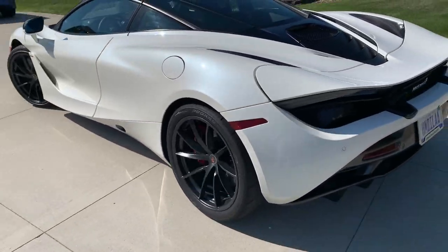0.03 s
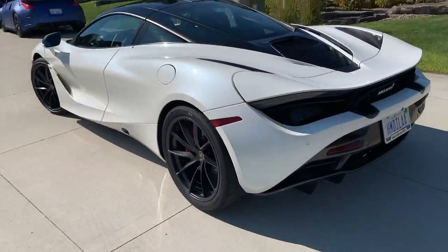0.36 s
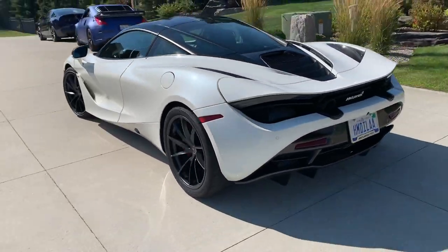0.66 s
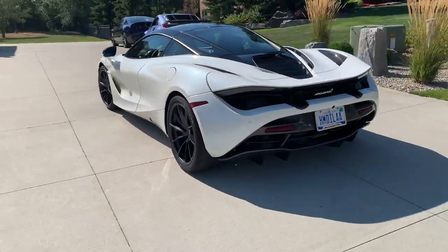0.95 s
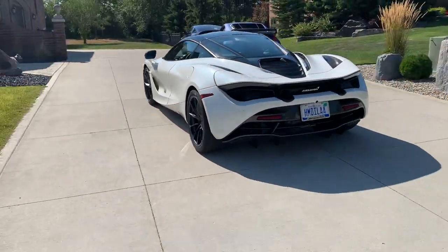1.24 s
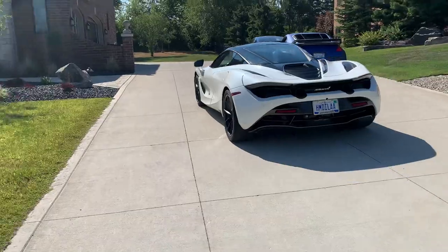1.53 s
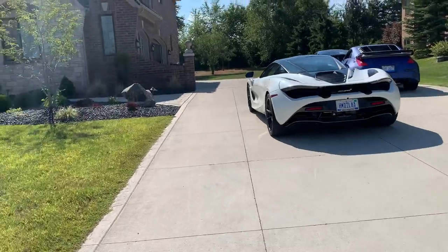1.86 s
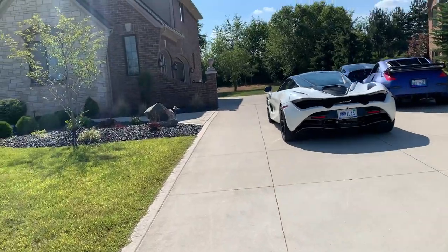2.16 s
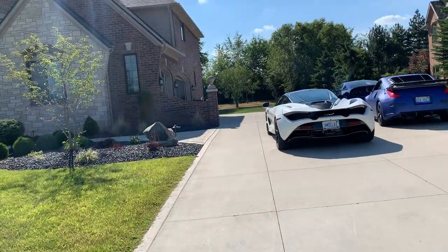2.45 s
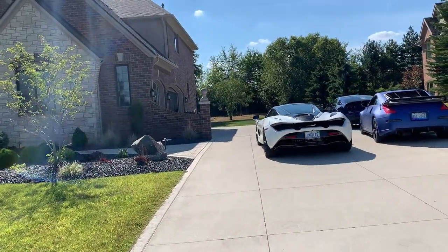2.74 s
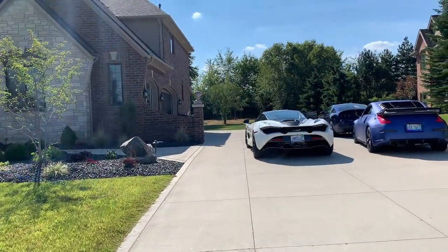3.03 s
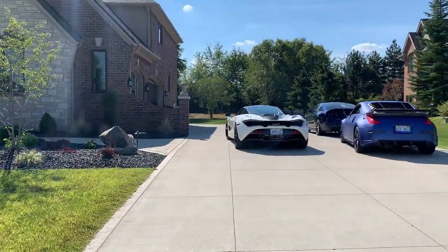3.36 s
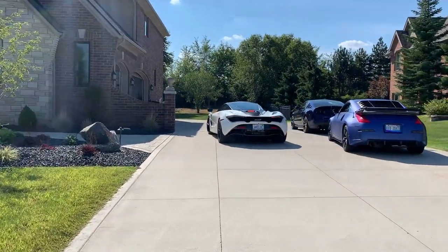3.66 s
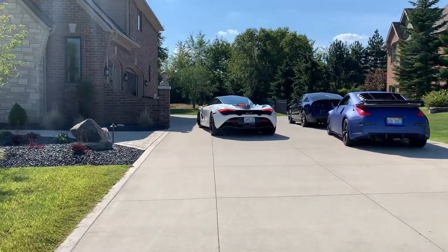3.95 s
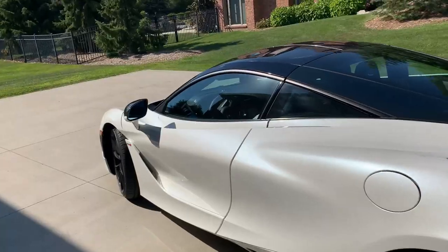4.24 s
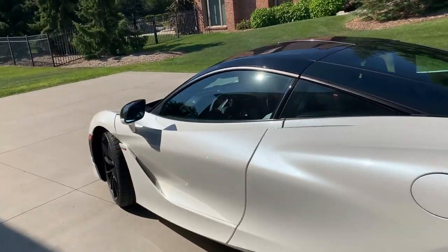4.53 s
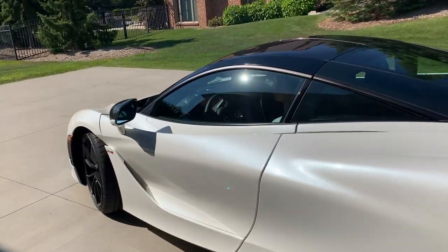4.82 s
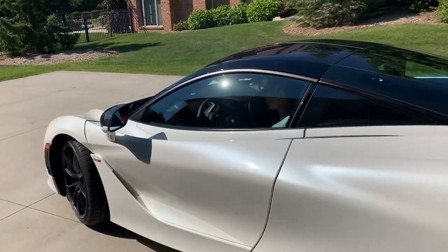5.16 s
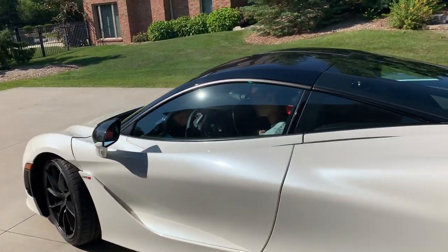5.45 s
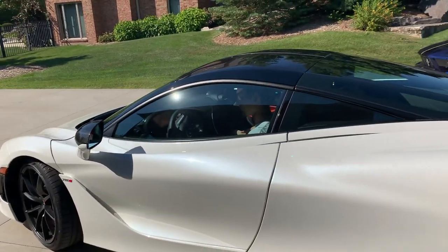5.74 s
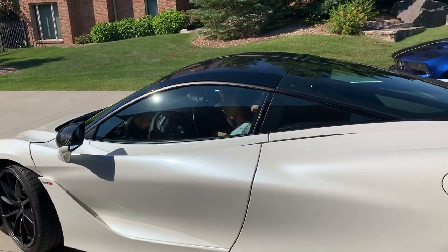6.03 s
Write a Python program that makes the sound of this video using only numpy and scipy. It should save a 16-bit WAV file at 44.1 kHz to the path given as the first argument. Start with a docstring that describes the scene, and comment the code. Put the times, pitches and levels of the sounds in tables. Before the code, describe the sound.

A sports car's engine booms deeply close to a hand-held phone on a concrete driveway, with small spits of exhaust and faint tyre hiss. From about 0.7 seconds it rises gently in pitch and swells into a raspy, barking growl, strongest around 1.5 seconds, as the car creeps away. At about 2 seconds the throttle closes. The engine falls in pitch and recedes in an uneven burble, with a few soft low pops, a faint gear whine and a short echo off a house. Light wind rumbles underneath. At 4.1 seconds the car's sound stops dead. A very quiet garden remains, with a low rumble and a thin, steady insect shrill. Small dry ticks sound close by between 4.3 and 5 seconds, soft rustles follow around 5.3, then a faint distant hum, and a few more ticks and rustles just after 6 seconds.

```python
"""A V8 sports car creeps away from a hand-held phone, up a concrete driveway, and rolls towards a halt.
Its periodic firings boom, excite the resonances of the tailpipes and expel turbulent puffs of gas;
off the throttle it burbles and a gear whines. The concrete and a house reflect the sound.
The engine sound stops dead, leaving a quiet garden: low rumble, insects, small ticks and rustles."""
import sys
import numpy as np
from scipy import signal
from scipy.fft import rfft, irfft, next_fast_len
from scipy.io import wavfile
from scipy.ndimage import uniform_filter1d

SR = 44100
rng = np.random.default_rng(int(sys.argv[2]) if len(sys.argv) > 2 else 0)


def store_wav(level_fs):
    """Save 16-bit WAV to argv[1]."""
    pcm = np.round(np.clip(np.atleast_2d(level_fs), -1, 1) * 32767)
    wavfile.write(sys.argv[1], SR, pcm.T.astype(np.int16))


N = 272978
T = np.arange(N) / SR
STOP_S = 4.108  # the car's sound ends

# firing rate of the engine: t/s, f/Hz
FIRING_RATE = [(0.0, 77.09), (0.35, 79.47), (0.7, 81.54), (0.9, 83.96), (1.12, 85.86), (1.44, 100.37),
               (1.6, 103.99), (1.89, 106.77), (2.1, 105.05), (2.33, 99.2), (2.49, 98.0), (2.66, 94.1),
               (3.43, 75.1), (3.66, 64.8), (3.8, 64.6), (4.1, 59.0)]
# path from the tailpipes to the phone: t/s, distance/m
DISTANCE = [(0, 2.2), (.7, 2.41), (1.2, 4.1), (2, 7.7), (3, 9.96), (4.1, 13.3)]
# spectrum of escaping gas: f/Hz, level/dB
HISS_SPECTRUM = [(2000, -23), (3400, 2.5), (4300, 3.5), (4800, -4.5), (5800, 0), (7500, 1.5), (8800, -1.5),
                 (10500, -6.5), (13000, -17.5), (15500, -16)]


def undb(db):
    """Amplitude ratio of a level in decibels."""
    return 10 ** (np.asarray(db) / 20)


def unit(x):
    """Normalisation to rms 1."""
    return x / np.sqrt(np.mean(x ** 2))


def curves(table):
    """Linear interpolation of each column over time."""
    s, *columns = np.transpose(table)
    return [np.interp(T, s, c) for c in columns]


def swell(s, half_s):
    """Gaussian envelope with peak 1."""
    return np.exp(-((T - s) / half_s) ** 2)


def noise():
    """White Gaussian noise."""
    return rng.standard_normal(N)


def drift(rate_hz):
    """Smooth random modulation; rms 1."""
    k = int(SR / rate_hz)
    steps = np.repeat(rng.standard_normal(N // k + 1), k)
    return unit(uniform_filter1d(steps, k)[:N])


def colour(x, spectrum):
    """Spectral shaping by points of f/Hz, level/dB; rms 1."""
    hz, db = np.transpose(spectrum)
    size = next_fast_len(N + SR // 4)
    f = np.maximum(np.fft.rfftfreq(size, 1 / SR), 1)
    gain = undb(np.interp(np.log(f), np.log(hz), db))
    return unit(irfft(rfft(x, size) * gain, size)[:N])


def band(x, hz, width):
    """Second-order resonator, gain 1 at its centre."""
    quality = hz / min(width, SR / 4)
    return signal.lfilter(*signal.iirpeak(min(hz, SR * .45), quality, fs=SR), x)


def ring(x, modes):
    """Superposition of steep-sided modes (f/Hz, nominal width/Hz, level/dB); rms 1."""
    return unit(sum(undb(db) * band(band(x, hz, 1.2 * width), hz, 1.2 * width)
                    for hz, width, db in modes))


def pulses(positions, sizes):
    """Impulse train at fractional sample positions; rms 1."""
    whole, part = positions.astype(int), positions % 1
    train = np.bincount(whole, sizes * (1 - part), N + 1) + np.bincount(whole + 1, sizes * part, N + 1)
    return unit(train[:N])


def throttle():
    """Engine load: the opening of the throttle, 0-1."""
    # one push of the pedal: t/s, opening/1
    pedal = [(0, 0.14), (.7, 0.62), (1.2, 0.84), (1.45, 0.89), (1.65, 0.73), (1.8, 0.48), (2.05, 0)]
    return np.clip(curves(pedal)[0], 0, 1)


def coasting(start_s=1.9, rise_s=.32):
    """Irregularity of combustion as the throttle shuts, 0-1."""
    return np.clip((T - start_s) / rise_s, 0, 1)


def settling(start_s=3.95, fall_db=-4):
    """Attenuation of the exhaust as the car comes to rest."""
    return undb(fall_db * np.clip((T - start_s) / (STOP_S - start_s), 0, 1))


def level(db, away_db=0, throttle_db=0, revs_db=0, aim_db=0, coast_db=0, idle_hz=80):
    """Gain from additive levels; away_db is per doubling of distance, revs_db per octave above idle."""
    metres, hz = curves(DISTANCE)[0], curves(FIRING_RATE)[0]
    on_axis = swell(1.21, .38)  # the pipes point at the phone for a moment
    return undb(db + away_db * np.log2(metres / metres[0]) + throttle_db * throttle()
                + coast_db * coasting() + revs_db * np.log2(hz / idle_hz) + aim_db * on_axis)


def silencer(hz):
    """Acoustic filter: the silencer lifts or absorbs a tone passing through one of its resonances."""
    # resonances: f/Hz, half width/Hz, gain/dB, extra gain at full throttle/dB
    resonances = [(142.3, 10, -12, 9.5), (182.9, 14, 3, 2), (243.7, 13, 0, -21), (318.7, 23, 0, 13),
                  (426, 28, 10.5, -4.5)]
    return undb(sum((db + extra_db * throttle()) * np.exp(-((hz - centre) / half) ** 2)
                    for centre, half, db, extra_db in resonances))


def boom(cycles, hz, flutter_db=1.15, overtone_flutter_db=2):
    """Harmonic series of the firing rate, with half orders from the unequal cylinder banks."""
    # fundamental: t/s, level/dB
    firing_level = [(0, -10.5), (1.1, -8), (1.48, -7.5), (1.8, -9), (2.0, -14.5), (2.22, -17.5),
                    (2.6, -18.5), (3.15, -17.5), (3.5, -21.5), (4.1, -22.5)]
    # its dips off the throttle: t/s, level change/dB, half length/s
    stumbles = [(2.406, -6.5, 0.026), (2.646, -24, 0.016), (2.827, -3, 0.043), (3.22, -18, 0.02),
                (3.352, -11.5, 0.0079), (3.568, -24.5, 0.018)]
    # tones of the banks: multiple of the firing rate, level/dB
    bank_tones = [(.5, -26), (1.5, 3), (2.5, -6), (3.5, -11.5), (4, -16), (5.5, -17)]
    dips_db = sum(db * swell(s, half) for s, db, half in stumbles)
    first = undb(curves(firing_level)[0] + flutter_db * coasting() * drift(24.9) + dips_db)
    second = level(-27, away_db=-1.5, throttle_db=4.5, revs_db=7) * silencer(2 * hz)
    second *= undb(overtone_flutter_db * coasting() * drift(20))
    third = level(-40.5, away_db=2, throttle_db=7) * silencer(3 * hz)
    third *= undb(overtone_flutter_db * coasting() * drift(27))
    angle = 2 * np.pi * cycles
    # these phases skew the pressure wave
    overtones = second * np.sin(2 * angle) + third * np.cos(3 * angle)
    firing = first * np.cos(angle) - settling() * overtones
    banks = sum(undb(db + .66 * drift(12)) * silencer(k * hz) * np.sin(k * angle)
                for k, db in bank_tones)
    return np.sqrt(2) * (firing + level(-23, away_db=-7, throttle_db=3, aim_db=1) * banks)


def tailpipes(starts, cylinder_db, force, flow):
    """Forced resonance: pressure pulses and gas noise drive the air columns of the pipes."""
    # pipe modes: f/Hz, nominal width/Hz, level/dB
    pipe_modes = [(326.1, 41.4, 3), (383.2, 46, 4.5), (421.6, 77, 2.5), (520, 43, 0.5), (607.6, 37, -4.5)]
    # modes that bark under load: f/Hz, nominal width/Hz, level/dB
    bark_modes = [(358.6, 24, 10.5), (589, 47, -4), (689, 160, 6), (809, 200, 2), (881, 32, -2.5)]
    blows = pulses(starts, undb(cylinder_db + 2 * force))
    pipe = ring(blows + .6 * flow * noise(), pipe_modes)
    # under load the cylinders push more evenly, and the bark merges into a growl
    even_blows = pulses(starts, undb(.4 * cylinder_db + force))
    bark = ring(even_blows + .7 * noise(), bark_modes)
    return (level(-17, away_db=-12.5, throttle_db=-4, revs_db=2.5) * pipe
            + level(-42, away_db=-3, throttle_db=20, revs_db=5.5) * bark)


def gas_jet(flow, puff_share):
    """Turbulence: the pulsating jet rasps and hisses, and hard puffs ring the metal pipe tips."""
    # spectrum of the rasp: f/Hz, level/dB
    rasp_spectrum = [(500, -25), (740, -7.5), (900, 4), (1000, -1.5), (1140, 10), (1300, -3), (1500, 3.5),
                     (1900, -7), (2450, -10), (2850, -11.5), (3300, -21.5), (4200, -20), (7000, -51.5)]
    # modes of the tips: f/Hz, nominal width/Hz, level/dB
    tip_modes = [(1150, 89, 0.5), (1874, 300, 4.5), (1958, 110, -1.5), (2390, 120, 3), (2680, 160, 7),
                 (3500, 160, -2), (4217, 130, -8), (5180, 150, -9.5), (5760, 190, -16.5)]
    rasp = colour(flow * noise(), rasp_spectrum)
    tips = puff_share ** 2 * ring(flow * noise(), tip_modes)
    hiss = colour(flow * noise(), HISS_SPECTRUM)
    return (level(-30.5, away_db=-10.5, throttle_db=6.5, revs_db=-1.5, aim_db=-1) * rasp
            + level(-34.5, away_db=-5, throttle_db=7, revs_db=-1.5) * tips
            + level(-44, away_db=-12.5, throttle_db=7, aim_db=12) * hiss)


def burble(starts, burn):
    """Uneven combustion: pulses of random size give a continuous low spectrum."""
    # spectrum of the burble: f/Hz, level/dB
    spectrum = [(22, -47), (40, 5.5), (60, 6.5), (105, 8.5), (140, 1), (185, 3), (245, -8), (310, 5),
                (400, -6.5), (470, -29), (580, -16.5), (800, -54)]
    gain = level(-26, away_db=-2, throttle_db=-1, revs_db=2, coast_db=4)
    return gain * colour(pulses(starts, burn) + 2.2 * noise(), spectrum)


def rattle(puff, index, centre_hz=3450, octaves=1.152):
    """Tone bursts: each puff whistles briefly at three random pitches of its own."""
    pitches = centre_hz * 2 ** (octaves * rng.uniform(-1, 1, (index[-1] + 1, 3)))
    whistles = sum(np.sin(2 * np.pi * np.cumsum(hz[index]) / SR) for hz in pitches.T)
    return level(-49, away_db=-9, throttle_db=5.5, aim_db=7.5) * unit(puff ** 1.1 * whistles)


def spits(rise_s=.0013, width_hz=88):
    """Transient excitation: a puff cracks at a pipe tip, a brief ring in a spray of hiss."""
    # spits of gas: t/s, level/dB, ring f/Hz
    cracks = [(.029, -37, 5900), (.054, -34.5, 4300), (.309, -34, 4260), (.311, -29.5, 6040),
              (.560, -27.5, 3570), (.634, -34.5, 4200), (.694, -38.5, 2360), (.851, -29, 4140),
              (.923, -35.5, 2900), (1.112, -27, 3930), (1.257, -34.5, 4463), (1.342, -33.5, 5260),
              (1.383, -36.5, 5460)]
    out, spray = np.zeros(N), undb(-7) * colour(noise(), HISS_SPECTRUM)
    for s, db, hz in cracks:
        age = np.maximum(T - s, 0) / rise_s
        out += undb(db) * age * np.exp(1 - age) * (ring(noise(), [(hz, width_hz, 0)]) + spray)
    return out


def exhaust(cycles, bank_lag_cycles=.063):
    """Pulse excitation: every firing strikes the pipes and releases a puff of gas."""
    # cylinders in firing order: relative level/dB
    cylinders = [-1.5, -4, 2.5, -3, 1, -2, -2, 1.5]
    firing = np.arange(int(cycles[-1]) + 3)
    slip, force, gas, burn = rng.standard_normal((len(firing), 4)).T
    cylinder_db = np.resize(cylinders, len(firing))
    # the valves open just ahead of the pressure crest; one bank's pulses arrive late
    due = firing - .12 + bank_lag_cycles * (firing % 2)
    scatter = .012 + .05 * np.interp(due, cycles, coasting())
    starts = np.interp(due + scatter * slip, cycles, np.arange(N))
    # gas rushes out just after each crest, then dies away
    valve_cycles = np.interp(cycles, due, firing)
    index, age = valve_cycles.astype(int), valve_cycles % 1 / .091
    puff = unit(age ** 4 * np.exp(-age) * undb(cylinder_db + 2.4 * np.tanh(gas))[index])
    puff_share = np.clip(.34 + .9 * throttle(), 0, 1)  # the rest flows steadily
    flow = np.sqrt(puff_share * puff ** 2 + 1 - puff_share)
    pipes = tailpipes(starts, cylinder_db, force, flow)
    jet = gas_jet(flow, puff_share)
    return settling() * (pipes + burble(starts, burn)) + ground(jet + rattle(puff, index) + spits())


def engine_bay():
    """Resonant noise: the engine bay whirrs in several bands."""
    # whirr: t/s, level/dB
    whirr_level = [(0, -53), (2, -50), (3, -49), (3.7, -52.5), (4.1, -72)]
    # modes of the bay: f/Hz, nominal width/Hz, level/dB
    bay_modes = [(1245, 120, 7), (1600, 410, -5), (1920, 270, 3), (2370, 360, 3.5), (2900, 250, -14),
                 (4560, 240, -11), (6175, 100, -12.5)]
    return undb(curves(whirr_level)[0]) * ring(noise() * undb(1.5 * drift(120)), bay_modes)


def tyres():
    """Rolling noise: tyres on concrete give a grainy broadband hiss."""
    # rolling noise: t/s, level/dB
    rolling_level = [(0, -45), (1.5, -45.5), (2.3, -55), (3, -60), (3.6, -85), (4.1, -85)]
    # its spectrum: f/Hz, level/dB
    spectrum = [(1000, 2.5), (4000, 5), (7000, 0), (10000, 2.5), (15500, -2)]
    return undb(curves(rolling_level)[0]) * colour(noise() * undb(2.5 * drift(390)), spectrum)


def intake(cycles, wobble_hz=130):
    """Amplitude modulation: intake air sings in one gliding resonance and throbs with the firings."""
    # intake resonance: t/s, f/Hz, level/dB
    resonance = [(.7, 2250, -45), (1.0, 2088, -37), (1.35, 1903, -42), (1.55, 1723, -34),
                 (1.75, 1725, -44.5), (2.0, 1760, -50), (4.1, 1872, -64.5)]
    hz, db = curves(resonance)
    wobble = signal.sosfilt(signal.butter(2, wobble_hz, fs=SR, output="sos"), noise() + 1j * noise())
    rush = unit(np.real(wobble * np.exp(2j * np.pi * np.cumsum(hz) / SR)))
    return undb(db) * rush * (1 + .5 * np.sin(2 * np.pi * cycles))


def ground(x, pipe_height_m=.76, phone_height_m=1.445, stereo_spread=.024):
    """Comb filtering: the concrete adds a reflection whose lag and strength shrink with distance."""
    metres = curves(DISTANCE)[0]
    strength = .45 * np.minimum(metres[0] / metres, 1) ** .8
    direct_m = np.hypot(metres, phone_height_m - pipe_height_m)
    reflected_m = np.hypot(metres, phone_height_m + pipe_height_m)
    lag_s = (reflected_m - direct_m) / 343
    reflection = np.array([np.interp(T - lag_s * (1 + side * stereo_spread), T, x) for side in (-1, 1)])
    return (x + strength * reflection) / np.hypot(1, strength)


def house(x, t60_s=.12, low_cut_hz=350):
    """Diffuse reflection from walls and parked cars, different in each channel and weak in the bass."""
    t = T[:SR // 2]
    tails = rng.standard_normal((2, len(t))) * undb(-60 * t / t60_s) * (t > .008)
    tails /= np.sqrt(np.sum(tails ** 2, axis=1, keepdims=True))
    bright = signal.sosfilt(signal.butter(1, low_cut_hz, "high", fs=SR, output="sos"), x)
    wet_db = np.interp(T, [1.2, 2.4], [-14.5, -10])  # the echoes' share grows as the car draws away
    return undb(wet_db) * signal.fftconvolve(bright, tails, axes=1)[:, :N]


def draught():
    """Wind noise: moving air rumbles independently on each microphone port."""
    spectrum = [(20, -42.5), (45, -9.5), (80, -4), (170, -16.5), (400, -23), (1500, -58)]
    gusts = np.array([colour(noise(), spectrum) for _ in range(2)])
    return undb(np.interp(T, [1.7, 2.4], [-33, -40])) * gusts


def pops():
    """Damped oscillation: single strong charges thump in the exhaust; the low ones ring longer."""
    # hard firings under load, late charges off the throttle: t/s, level/dB, f/Hz
    charges = [(1.077, -15, 690), (1.257, -11.5, 730), (1.341, -11, 730), (1.423, -18.5, 780),
               (1.502, -10.5, 850), (1.58, -17, 785), (1.657, -19, 770), (1.733, -21, 719),
               (2.358, -13, 65.7), (2.375, -22, 273), (2.856, -16.5, 265), (3.117, -15.5, 109),
               (3.568, -31, 300)]
    out = np.zeros(N)
    for s, db, hz in charges:
        periods = np.maximum(T - s, 0) * hz
        out += undb(db) * periods * np.exp(1 - periods) * np.sin(2 * np.pi * periods)
    return out


def gear_whine(cycles, teeth_per_firing=9.42):
    """Meshing tone: gear teeth engage at a multiple of the firing rate, with slight phase jitter."""
    # whine: t/s, level/dB
    whine_level = [(1.5, -87), (2.03, -44), (2.3, -62), (2.52, -48), (2.65, -47), (2.76, -56),
                   (2.95, -56.5), (3.25, -41.5), (3.45, -50), (3.7, -75)]
    mesh = np.sin(2 * np.pi * teeth_per_firing * cycles + .6 * drift(70))
    return undb(curves(whine_level)[0] + 2 * drift(25)) * mesh


def brakes():
    """Friction: the brakes rub in one narrow band as the car slows."""
    return undb(-55) * np.interp(T, [3.7, 3.95], [0, 1]) * ring(noise(), [(1105, 91, 0)])


def car():
    """Superposition of the car's sources; exhaust, intake and gear share the crankshaft's phase."""
    hz = curves(FIRING_RATE)[0]
    cycles = np.cumsum(hz * (1 + .0015 * drift(30))) / SR  # firings elapsed
    running_gear = gear_whine(cycles) + ground(engine_bay() + tyres()) + brakes()
    return running_gear + boom(cycles, hz) + exhaust(cycles) + intake(cycles) + pops()


def garden():
    """Ambient noise: a rumble, partly coherent between channels, swells once; a brief distant hum."""
    # outdoor background: f/Hz, level/dB
    spectrum = [(20, -17), (45, 1.5), (85, 4), (140, -4), (200, -10), (300, -10.5), (420, -20),
                (620, -24.5), (850, -23.5), (1200, -31.5), (1900, -35.5), (2800, -45), (6000, -48.5),
                (15000, -62.5)]
    common, *sides = [colour(noise(), spectrum) * undb(1.4 * drift(13)) for _ in range(3)]
    rumble = undb(-53.5 + 3.5 * swell(4.64, .22)) * (common + .87 * np.array(sides))
    hum = undb(-60.5) * np.exp(-((T - 5.82) / .26) ** 4) * ring(noise(), [(250.8, 6.3, 0)])
    return rumble + hum


def insects():
    """Narrow-band noise: a steady insect shrill and single chirps."""
    # chirps: t/s, level/dB
    chirps = [(2.06, -60), (2.70, -60), (3.191, -60), (3.573, -58), (3.95, -57)]
    shrill = undb(-69.5 + 1.5 * drift(16)) * ring(noise(), [(8560, 770, 0)])
    envelope = sum(undb(db) * np.exp(-((T - s) / .032) ** 4) for s, db in chirps)
    return shrill + envelope * ring(noise(), [(7940, 180, 0)])


def rustles():
    """Band noise under smooth envelopes: soft rustles close by."""
    # rustles: t/s, level/dB, f/Hz, half length/s
    events = [(3.506, -59, 4400, 0.048), (5.306, -65, 466, 0.24), (5.338, -63, 750, 0.056),
              (5.364, -61, 1780, .06), (5.526, -68.5, 1770, 0.054), (5.729, -82.5, 3840, 0.032),
              (6.119, -71, 1498, 0.029), (6.142, -58.5, 338, 0.1)]
    return sum(undb(db) * ring(noise(), [(hz, .28 * hz, 0)]) * swell(s, half)
               for s, db, hz, half in events)


def ticks():
    """Broadband transients with exponential decay: dry ticks close by."""
    # ticks: t/s, level/dB, f/Hz, decay time/s
    events = [(4.276, -68, 3450, 0.014), (4.433, -66, 1300, 0.014), (4.507, -56, 587, 0.027),
              (4.511, -70, 2404, 0.023), (4.655, -67, 4130, 0.019), (4.706, -59.5, 4200, 0.017),
              (4.706, -66, 1900, 0.016), (4.944, -69, 7060, 0.009), (5.229, -61, 910, 0.087),
              (6.076, -55.5, 8070, 0.017), (6.091, -59, 700, .04), (6.178, -54, 890, 0.03)]
    return sum(undb(db) * ring(noise(), [(hz, 1.3 * hz, 0)]) * (T > s) * np.exp(-np.abs(T - s) / decay)
               for s, db, hz, decay in events)


def scene(fade_s=.00285):
    """Unmasking: the car, its echoes and the draught end abruptly; the garden carries on."""
    direct = car()
    running = np.clip((STOP_S - T) / fade_s + .5, 0, 1)
    return (direct + house(direct) + draught()) * running + garden() + insects() + ticks() + rustles()


def record(dry, ceiling=.94, top_hz=15800):
    """Phase and level differences between the phone's two ports, then soft clipping and a low-pass."""
    # phase between the ports: f/Hz, lead of the left/rad
    port_phase = [(20, 0), (750, .1), (1350, .8), (1850, 1.9), (2300, 1.7), (2750, 2.3), (3300, -1.2),
                  (4300, -.3), (4900, -1.3), (6100, -.9), (7300, -1.8), (8500, -3.14), (9600, -4.5),
                  (10500, -6.2), (11600, -6.3), (12400, -8.3), (13400, -9.42), (14400, -10.4),
                  (15300, -12.5)]
    # imbalance of the ports: f/Hz, left minus right level/dB
    port_balance = [(60, 1), (110, -0.5), (200, 0.5), (380, -0.5), (700, 0), (1290, 2), (2380, -1),
                    (4400, -5), (8120, 0), (15000, -0.5)]
    size = next_fast_len(N + SR // 4)
    hz = np.fft.rfftfreq(size, 1 / SR)
    lead, tilt_db = (np.interp(hz, *np.transpose(table)) for table in (port_phase, port_balance))
    side = np.array([[.5], [-.5]])
    response = np.exp(1j * side * lead) * undb(side * tilt_db)
    heard = irfft(rfft(dry, size) * response, size)[:, :N]
    rounded = heard / (1 + (heard / ceiling) ** 12) ** (1 / 12)
    return signal.sosfilt(signal.ellip(10, .2, 80, top_hz, fs=SR, output="sos"), rounded)


dry = scene()
out = record(dry)
store_wav(out)
```